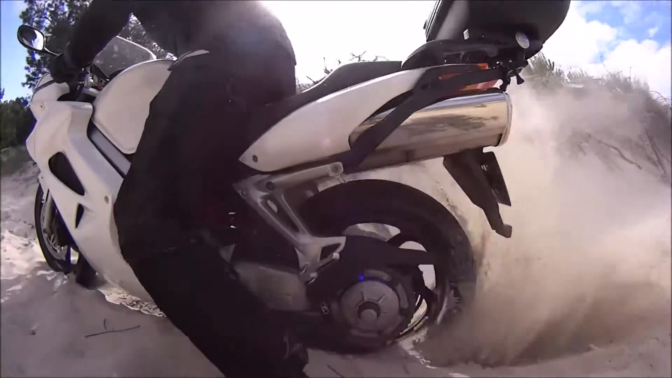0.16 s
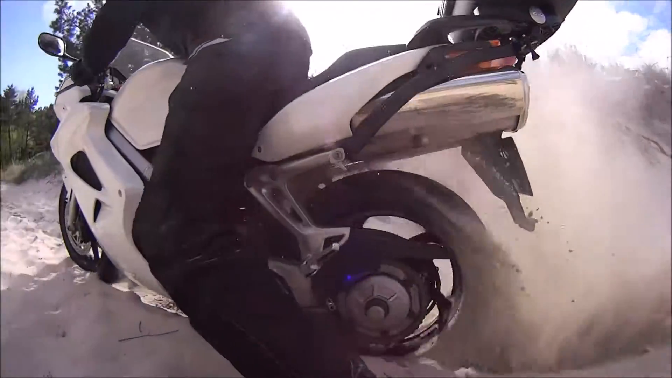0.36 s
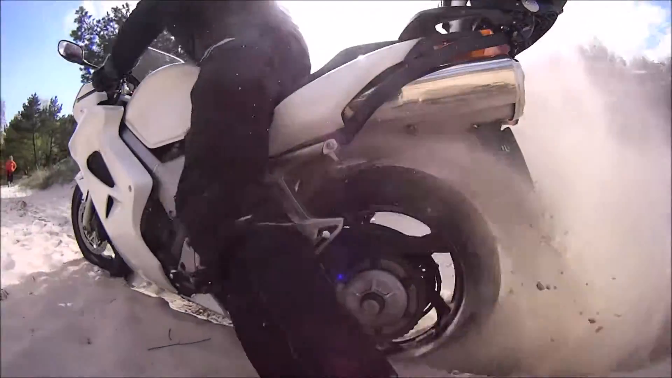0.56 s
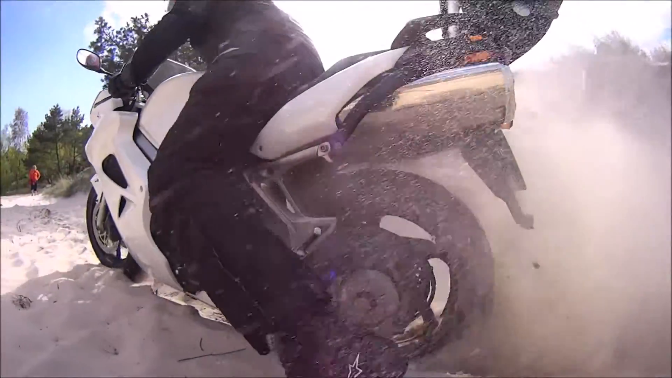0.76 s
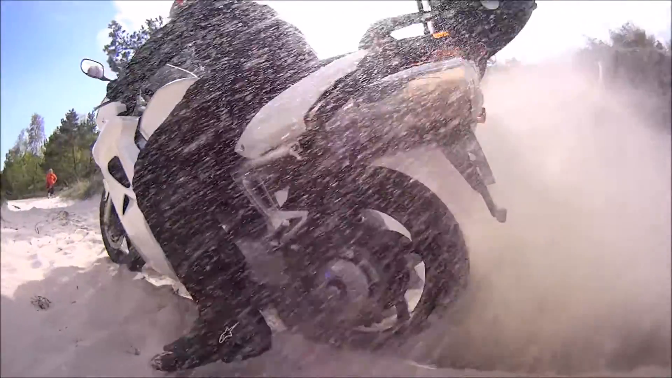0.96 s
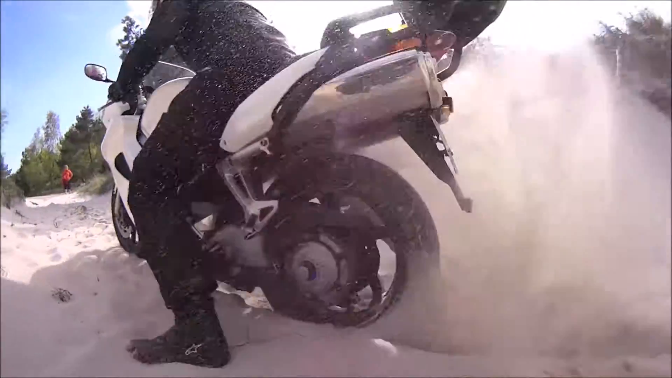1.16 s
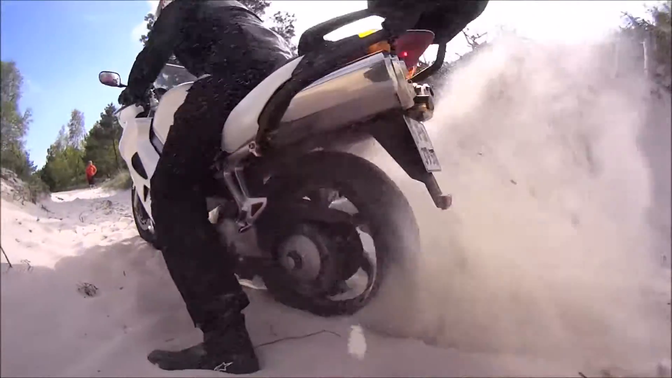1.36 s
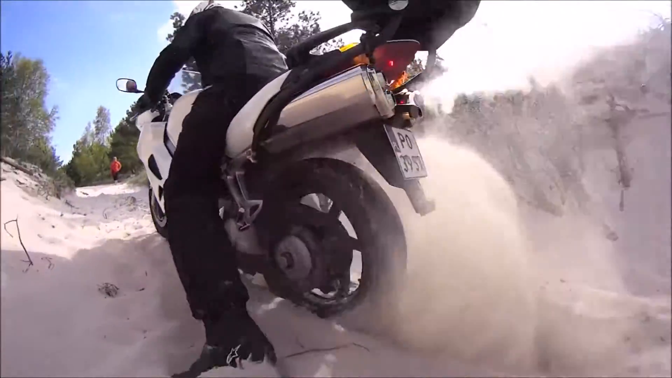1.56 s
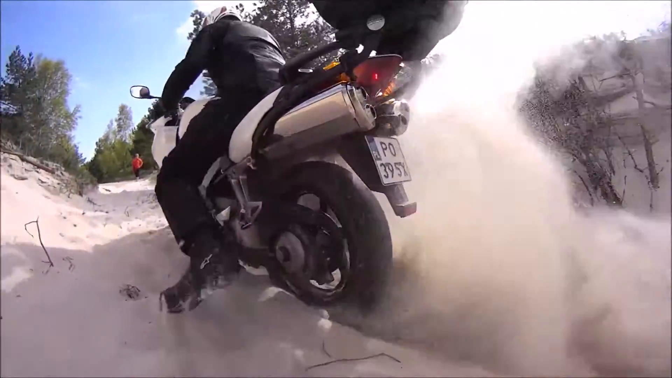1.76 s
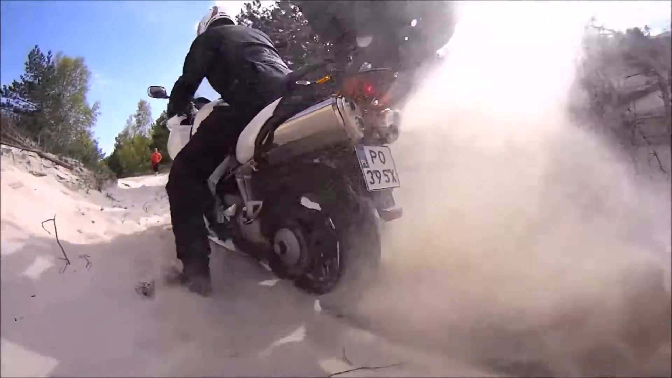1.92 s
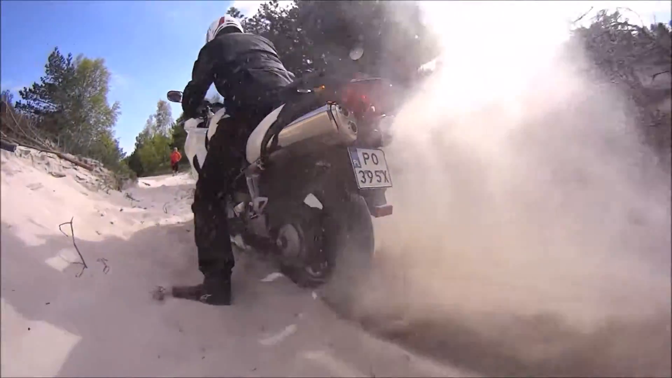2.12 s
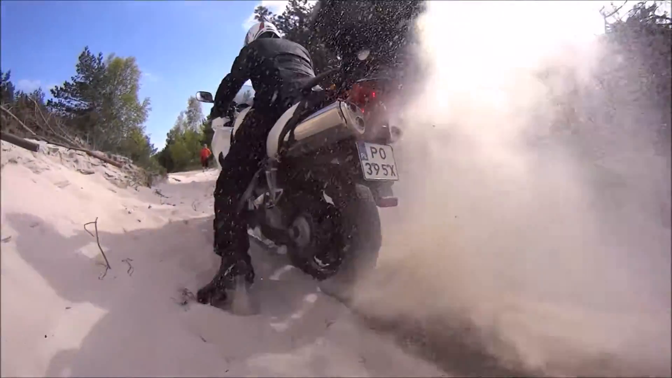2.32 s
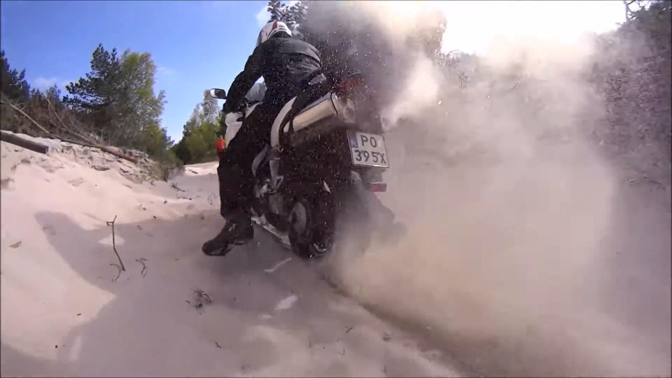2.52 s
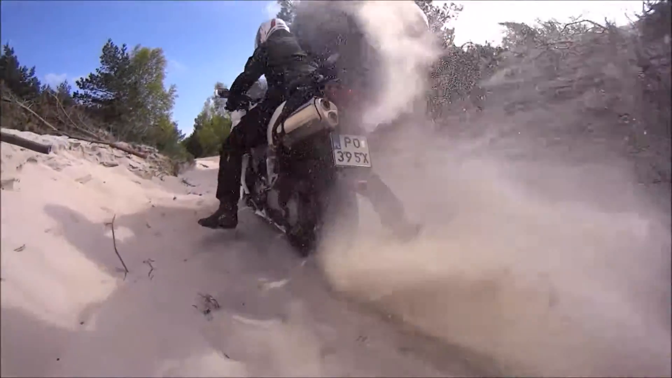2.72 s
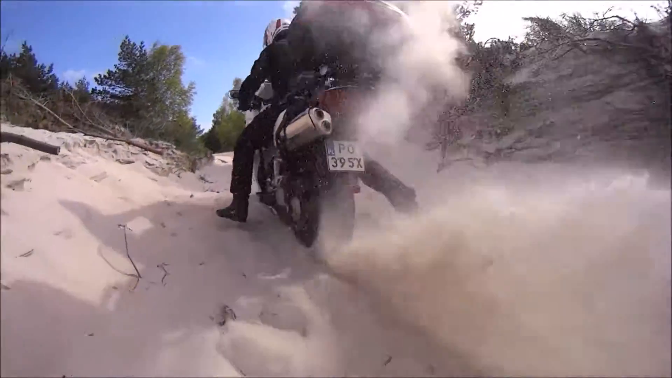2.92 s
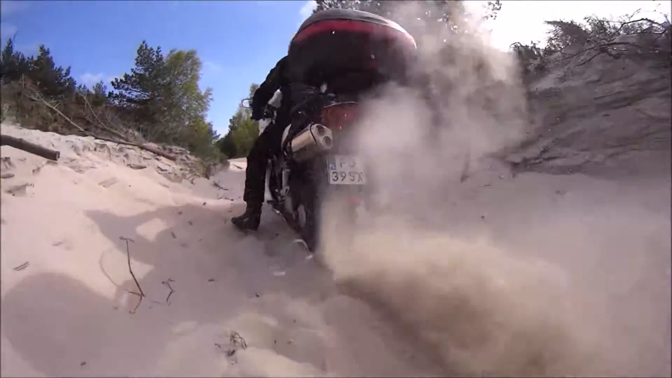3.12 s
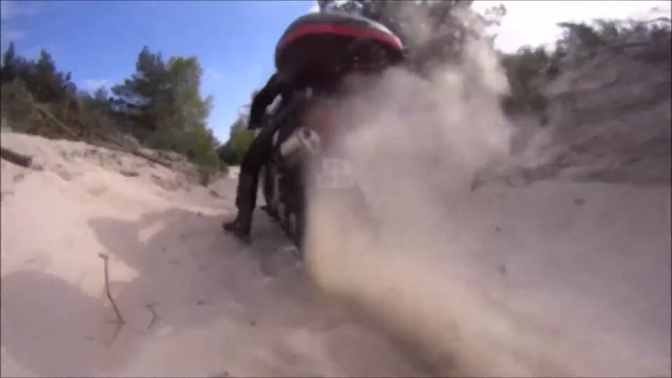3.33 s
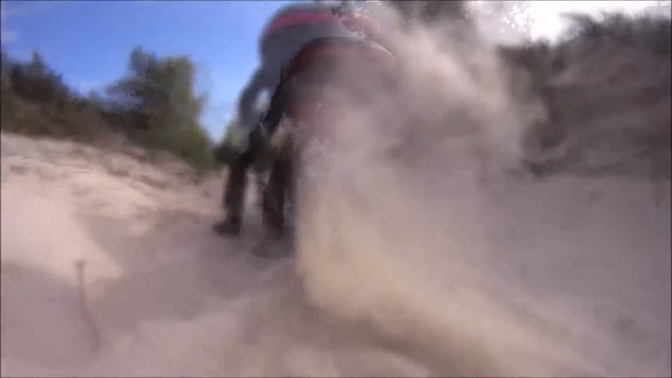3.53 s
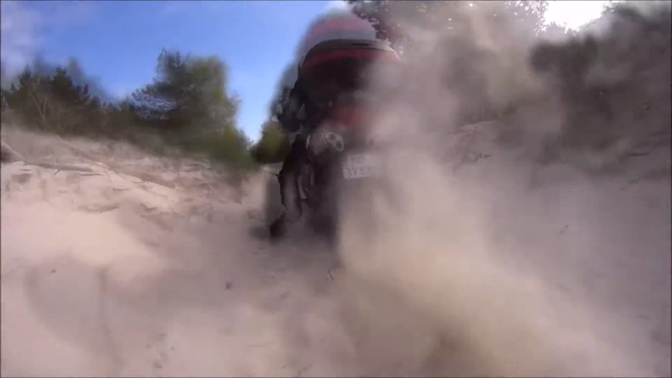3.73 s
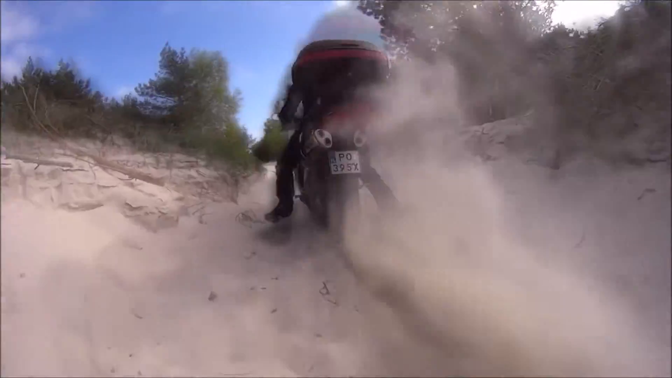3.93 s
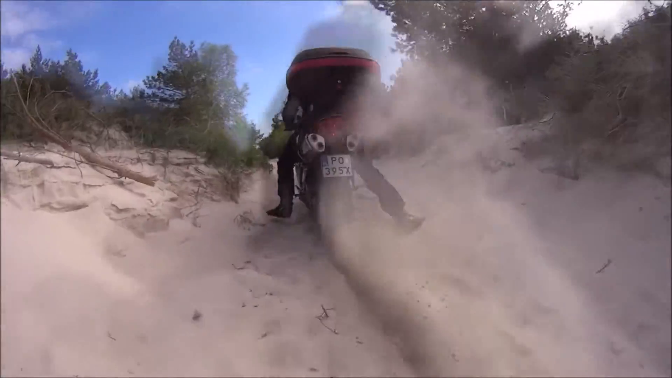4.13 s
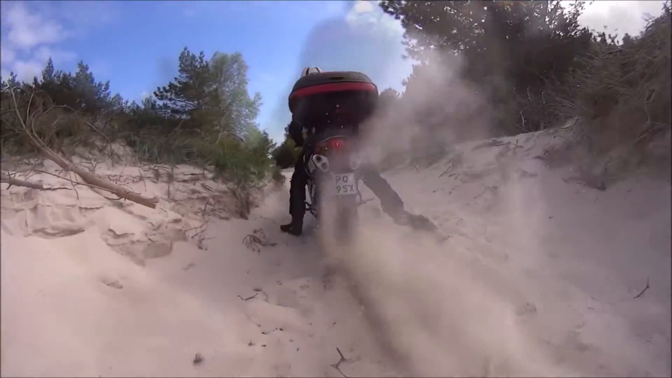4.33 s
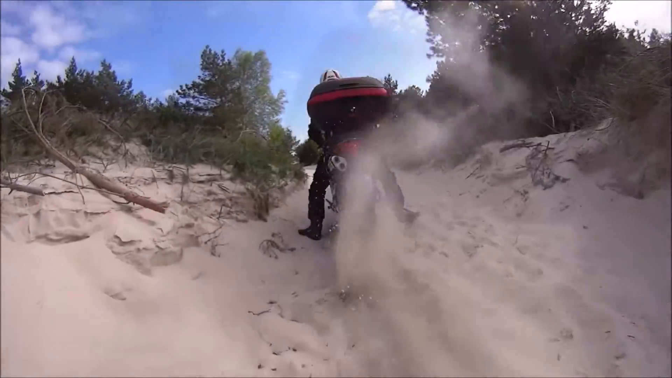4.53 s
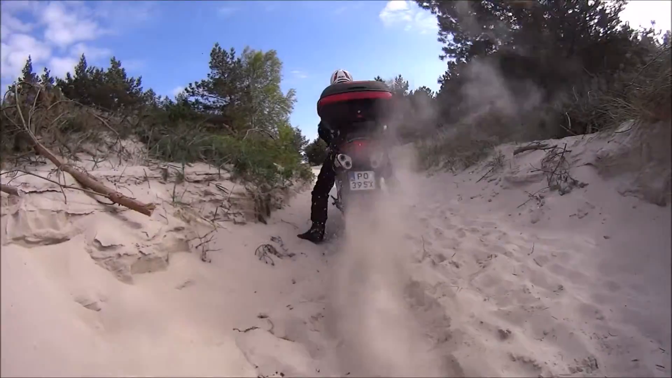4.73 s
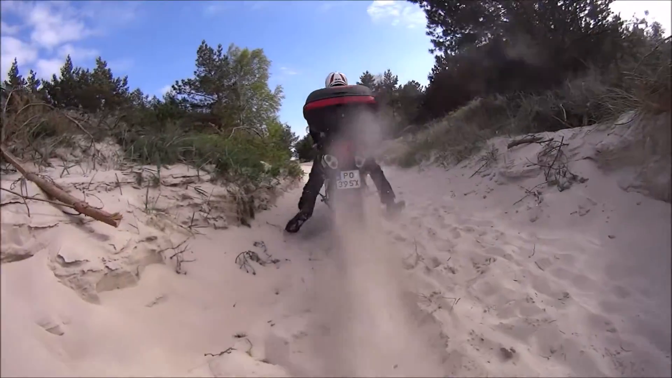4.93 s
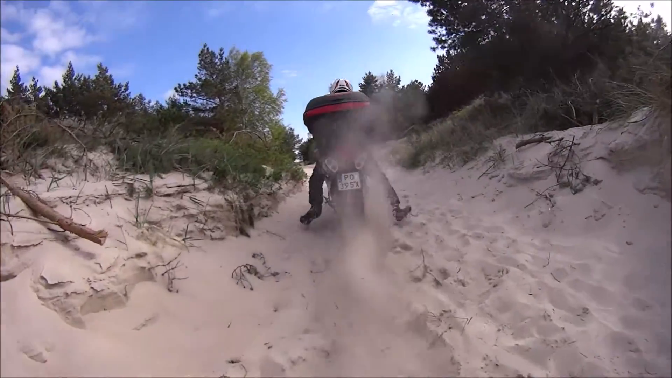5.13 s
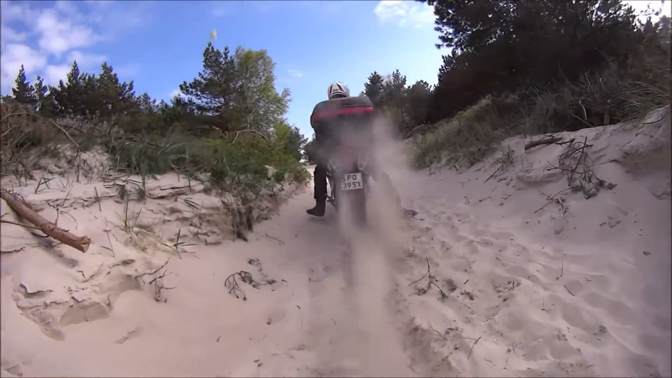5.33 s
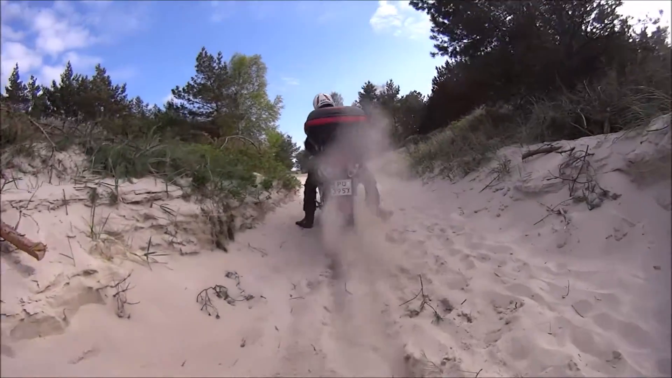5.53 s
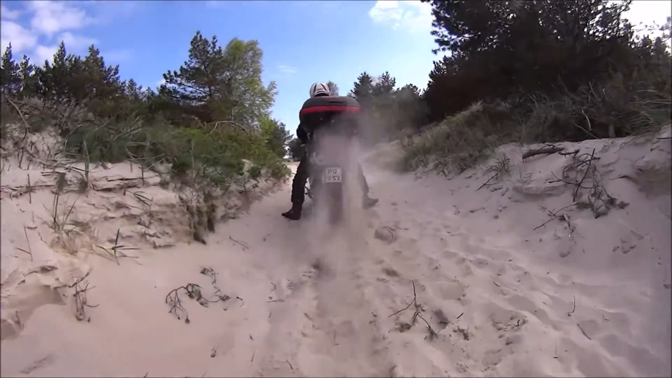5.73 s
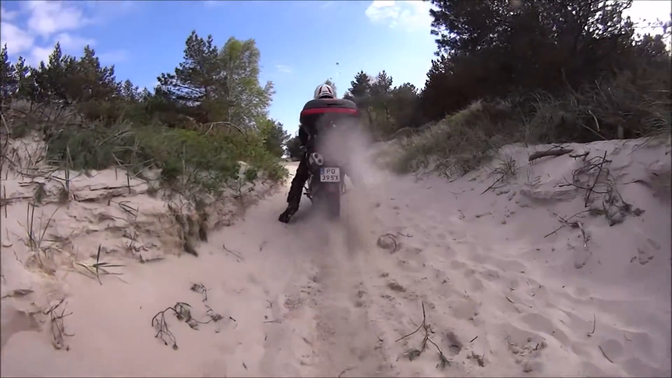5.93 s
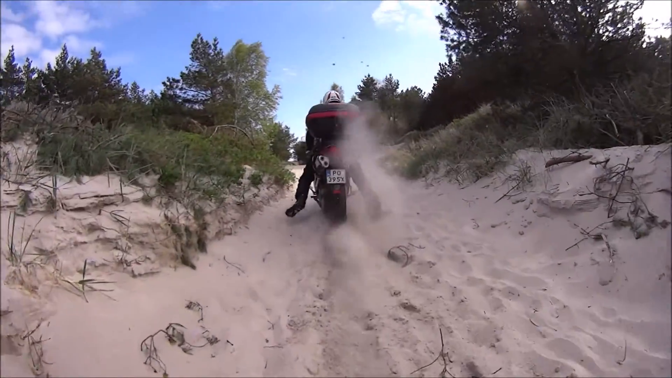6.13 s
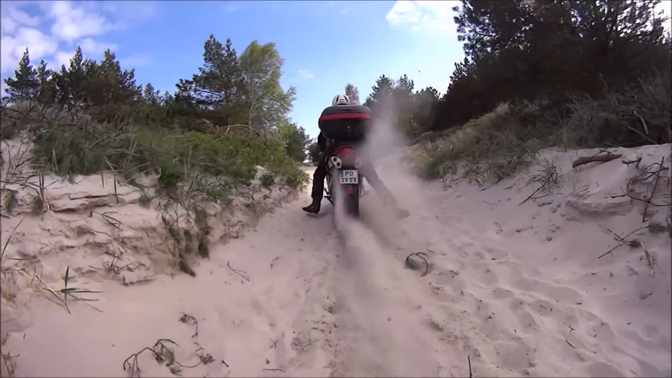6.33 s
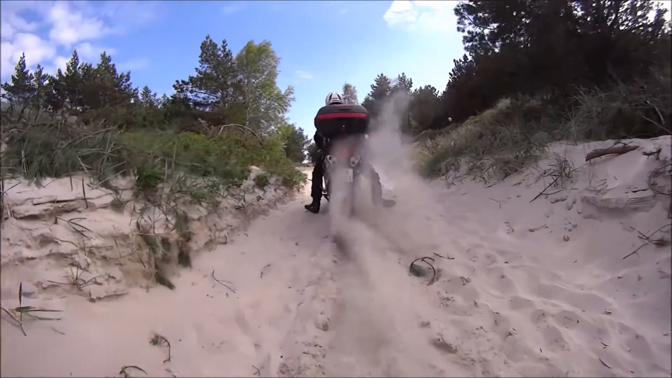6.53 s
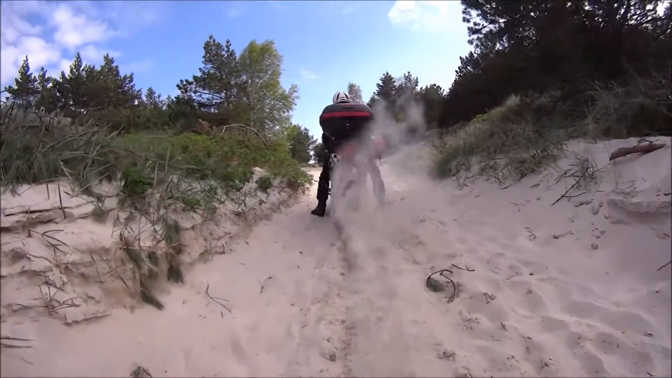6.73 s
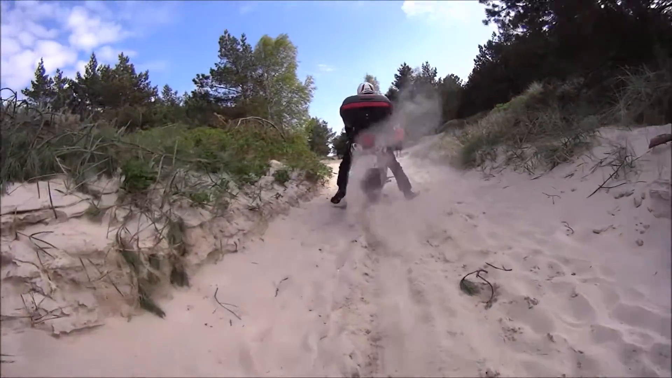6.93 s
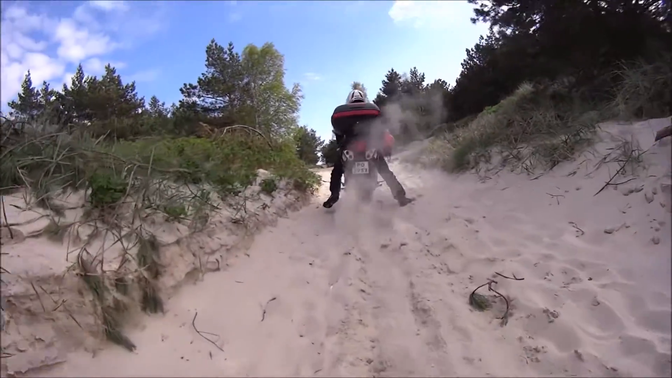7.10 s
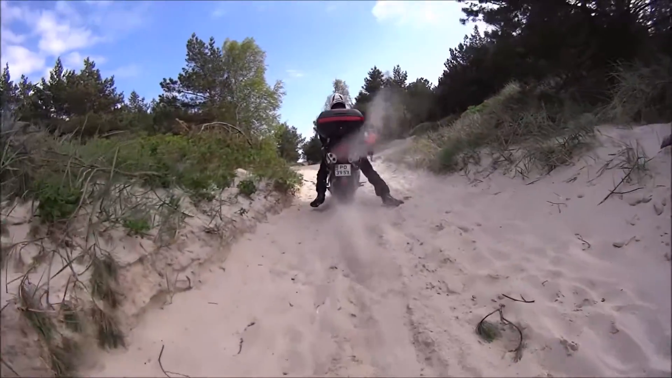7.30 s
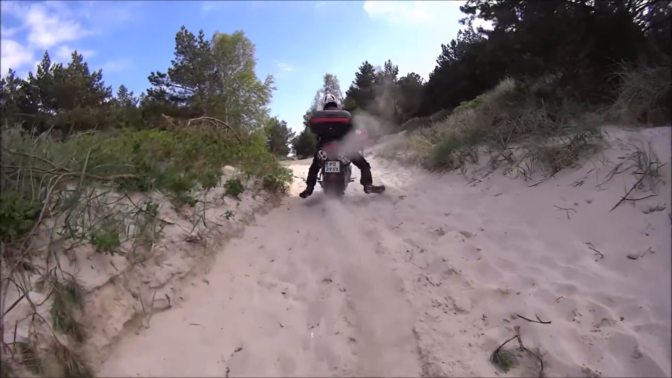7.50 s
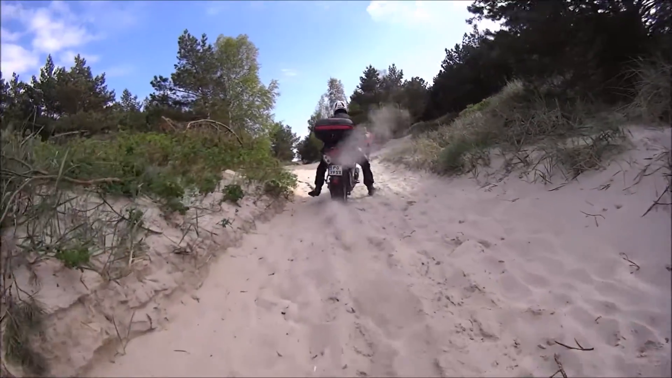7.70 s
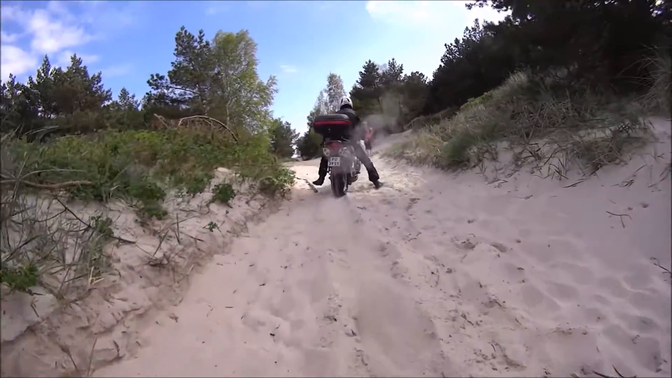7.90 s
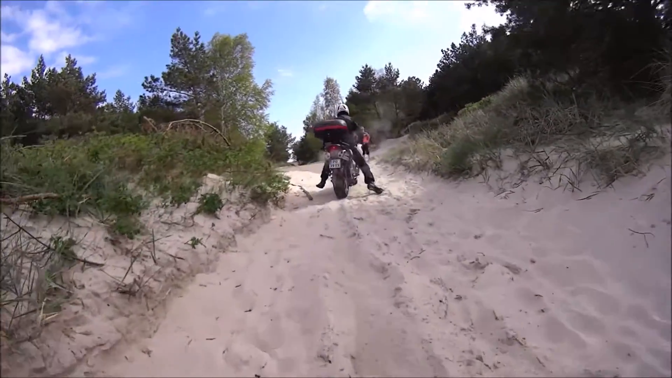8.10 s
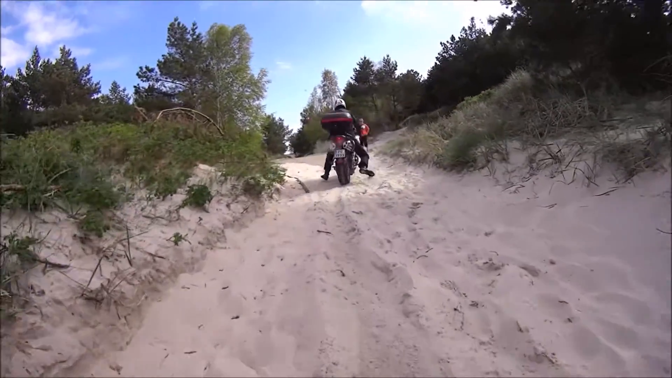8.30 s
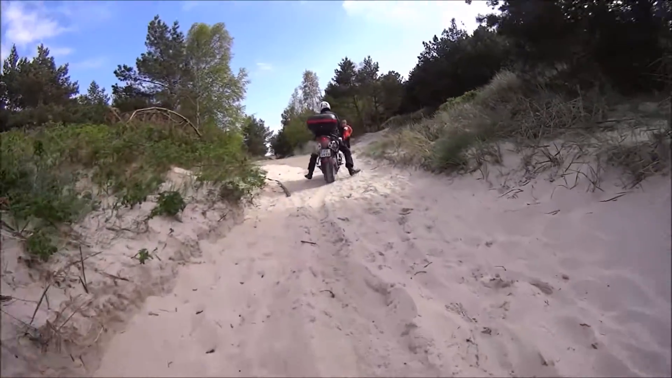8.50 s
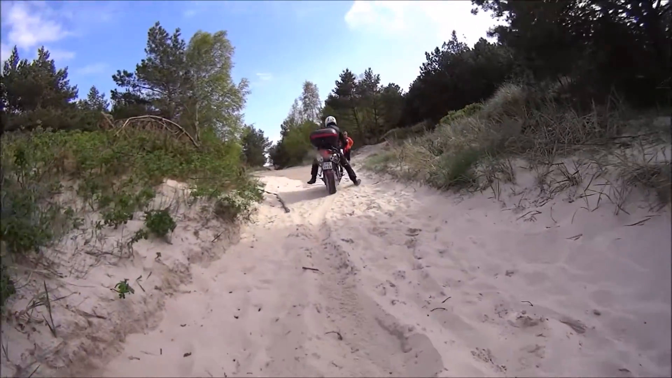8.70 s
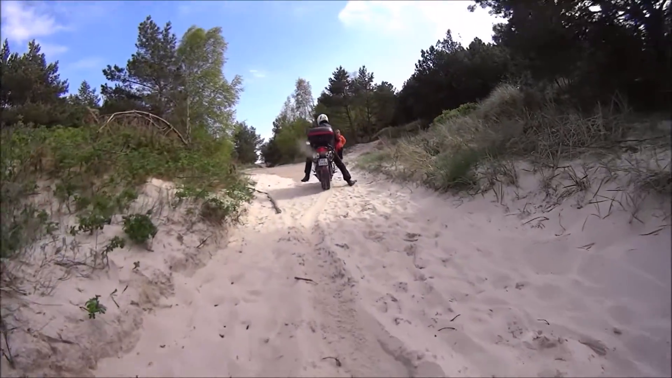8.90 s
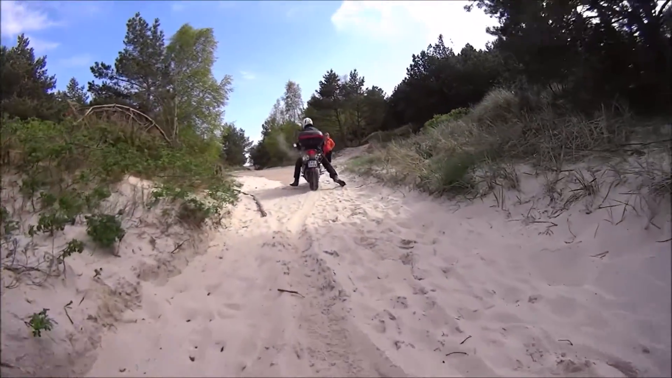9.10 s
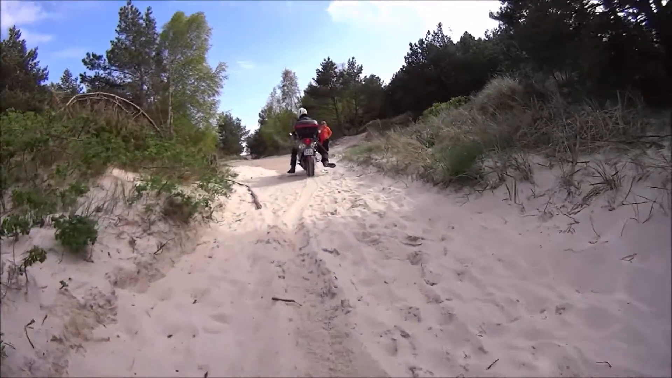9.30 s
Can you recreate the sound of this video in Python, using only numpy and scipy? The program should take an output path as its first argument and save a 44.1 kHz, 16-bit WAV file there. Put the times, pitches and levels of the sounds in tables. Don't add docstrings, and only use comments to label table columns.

```python
import sys
import numpy as np
from scipy import signal
from scipy.fft import rfft, irfft, next_fast_len
from scipy.io import wavfile
from scipy.ndimage import uniform_filter1d

SR = 44100
rng = np.random.default_rng(int(sys.argv[2]) if len(sys.argv) > 2 else 0)


def boost(x):
    u = np.asarray(x, float) / 20
    return 10 ** u


def wav_out(sig):
    wavfile.write(sys.argv[1], SR, np.round(np.clip(np.atleast_2d(sig).T, -1, 1) * 32767).astype(np.int16))


N = 412335
T = np.arange(N) / SR

# pitch_hz [Hz], density_db [dB per Hz]
RUMBLE_SPECTRUM = [(12, -37), (20, 2), (43, -2.5), (80, 1.5), (114, -1), (296, -13.5), (331, -47),
                   (400, -52), (520, -66), (880, -120)]
# centre_s [s], width_s [s], level_db [dB over the rumble]
WIND_GUSTS = [(1.2, .1, 8), (1.5, 0.13, 15), (2.7, 0.28, 7), (3.8, 0.27, 10), (4.09, 0.055, 4),
              (4.5, 0.18, 6), (5.78, 0.092, 2), (6.5, 0.047, 7), (6.75, .06, -1.5), (7.19, 0.13, 5.5),
              (7.55, 0.18, 2.5), (8.35, 0.79, -2)]
# start_s [s], peak_db [dB], ring_hz [Hz], t60_s [s], snap_db [dB]
HOUSING_KNOCKS = [
    (8.065, -15.5, 72, 0.042, -9.5),
    (8.236, -21.5, 97, 0.097, -13),
    (8.444, -21.5, 91, 0.049, -9),
    (8.639, -36.5, 150, 0.076, -2),
    (9.125, -32.5, 85, 0.1, -9),
    (9.232, -28, 106, 0.21, 1),
    (9.271, -39, 95, 0.12, 11),
]
# start_s [s], peak_db [dB]
SAND_CLODS = [
    (.787, -56),
    (1.851, -34),
    (2.477, -28),
    (2.501, -28),
    (2.582, -38),
    (3.281, -38),
    (3.308, -25),
    (3.384, -30),
    (3.638, -29.5),
    (4.27, -31),
]
# start_s [s], level_db [dB over the hiss], length_s [s]
BOOT_STEPS = [
    (8.125, 5, .05),
    (8.745, 10, .05),
]
# pitch_hz [Hz], left_db [dB], right_db [dB], likeness [0-1]
PORT_RESPONSE = [(231, -7, -6.5, 0), (617, -17.5, -15.5, 0.28), (1236, -9.5, -10.5, 0.47),
                 (1370, -4.5, -10, 0.66), (2106, 1.5, -1.5, 1), (2380, -1.5, -4.5, 0.66),
                 (2980, -5, 3, 0.86), (3840, -8, -9, 0.5), (4000, -7.5, -7.5, 0.77), (5320, -6, -8.5, 0.75),
                 (6080, -14.5, -13.5, 0.45), (7220, -10, -9.5, 0.73), (10070, -18, -20.5, 0.5),
                 (10950, -25.5, -24, 1)]
# pitch_hz [Hz], left_lead [radians]
PORT_LEAD = [(0, 0), (520, .2), (900, 3.1), (1200, 5.7), (1550, 4.8), (2150, 4.4), (2760, 2.1), (3100, 1.2),
             (4050, .5), (5750, -.4), (6550, .4), (7150, .1), (8500, .5), (9300, -.4), (10600, 0)]
# pitch_hz [Hz], width_hz [Hz], peak_db [dB]
CAVITY_RINGS = [(400, 52, -1), (683, 12, 5), (1870, 115, 4), (2840, 147, 6), (3290, 9.7, 4.5),
                (3900, 25, 3.5)]
WHISTLE_S, WHISTLE_END_S, WHISTLE_HZ, WHISTLE_DB = 3.32, 4.78, 1910, -23.5
# start_s [s], end_s [s], pitch_hz [Hz], level_db [dB]
JET_WHISTLES = [
    (WHISTLE_S, WHISTLE_END_S, WHISTLE_HZ, WHISTLE_DB),
    (1.5, 3, 4380.5, -26.5),
    (6.5, 7.5, 3369, -30.5),
]
# start_s [s], aim_hz [engine cycles a second]
THROTTLE_STEPS = [(0, 36.5), (.77, 26.2), (.94, 6.8), (1.24, 25.4), (1.52, 46.7), (1.9, 32.3), (2.18, 37.8),
                  (2.58, 42.6), (2.7, 34.6), (2.98, 27.3), (3.15, 37.8), (3.51, 35.3), (3.89, 38.4),
                  (4.21, 35.8), (4.55, 42.6), (4.86, 33.9), (5.29, 29.1), (5.72, 38), (6.03, 36.1),
                  (6.28, 28.3), (6.74, 33.4), (6.95, 36.9), (7.47, 38.6), (7.74, 7)]
# time_s [s], rasp_db [dB]
RASP_EFFORT = [(0, -21), (1.05, -20.5), (1.24, -30), (1.36, -22.5), (1.68, -19), (1.9, -21.5), (3.02, -22),
               (3.25, -24.5), (3.3, -20), (3.93, -19.5), (4.77, -20.5), (4.81, -24.5), (5.65, -31.5),
               (5.95, -27.5), (6.65, -32), (7.24, -31), (7.82, -28.5), (8.03, -46)]
# overtone [number], follows [row of MESH_LEVELS], added_db [dB], blur_hz [Hz]
GEAR_OVERTONES = [(1, 0, 5, 8), (2, 0, 4, 8), (2.85, 0, 1, 10), (3, 0, 9, 7), (3.5, 2, -2, 20),
                  (4, 1, -1, 14), (5, 2, 5, 22), (6, 2, 2, 22), (7, 3, 8, 22), (8, 3, 5, 35), (9, 4, 6, 25)]
# level_db [dB at full effort], effort_share [ratio]
MESH_LEVELS = [(-39, 1.16), (-31.5, 0.5), (-32, 0.66), (-37.5, 0.72), (-34.5, 0.98)]
# start_s [s], length_s [s], added_db [dB]
LOADED_TEETH = [
    [(.25, 0.6, 9), (2.35, 0.94, 7), (7.15, 0.57, 9)],
    [(0, 0.11, 16), (0.415, 0.082, 14), (0.802, 0.3, 8), (2.455, 0.12, 8.5), (2.72, 0.48, 11),
     (3.4, 0.64, 10), (5.2, 0.17, 6), (5.9, 0.12, 6), (7.45, 0.17, 0)],
    [(1.97, 0.15, -2), (6.42, .22, 5), (7.68, 0.13, 1)],
    [(2.65, .2, 3), (3.9, 0.13, 8), (6.08, 0.28, 6), (7.3, 0.25, 4)],
    [(2.3, .2, -1)],
]
# order [number], pipe_db [dB at resonance], side_db [dB added sideways], lug_db [dB]
MAIN_ORDERS = [(3, -33.5, 9, -35.5), (4, -32, -7.5, -57), (5, -39, 1, -32)]
# order [number], level_db [dB against the rasp]
WEAK_ORDERS = [(1, -22.5), (2, -26), (6, -27), (7, -27.5), (8, -35.5), (11, -24), (12, -40), (14, -36.5),
               (15, -35), (16, -29), (18, -32), (19, -38.5), (21, -44), (23, -35.5), (24, -28), (27, -64),
               (31, -29), (33, -37), (35, -20.5)]


def evened(x):
    return x / np.sqrt(np.mean(x ** 2) + 1e-20)


def columns(rows, at):
    first, *rest = np.transpose(rows)
    return [np.interp(at, first, c) for c in rest]


def log_columns(rows, hz):
    return columns([(np.log(f), *rest) for f, *rest in rows], np.log(hz + 1))


def filtered(x, gain):
    size = next_fast_len(N + 4096)
    return irfft(rfft(x, size) * gain(np.fft.rfftfreq(size, 1 / SR)), size)[..., :N]


def bump(t, s, width):
    return np.exp(-.5 * ((t - s) / width) ** 2)


def drift(top_hz, count=24):
    coarse = T[::256]
    waves = 0
    for f in np.geomspace(.3, top_hz, count):
        waves = waves + np.sin(2 * np.pi * (f * coarse + rng.random())) / np.sqrt(f)
    return np.interp(T, coarse, evened(waves))


def flutter(top_hz):
    knots = np.arange(0, T[-1] + 1, .5 / top_hz)
    chance = np.interp(T, knots, rng.standard_normal(len(knots)))
    return evened(uniform_filter1d(chance, size=600))


def blurred_line(turns, blur_hz, steady=0):
    coarse = T[::64]
    r = np.exp(-np.pi * blur_hz * 64 / SR)
    a, b = evened(signal.lfilter([1], [1, -r], rng.standard_normal((2, len(coarse)))))
    in_phase = (steady + np.interp(T, coarse, a)) * np.cos(2 * np.pi * turns)
    quadrature = np.interp(T, coarse, b) * np.sin(2 * np.pi * turns)
    return evened(in_phase + quadrature)


def speed(t):
    flywheel_s, full_lug_hz_per_s, coast_share = .1107, 25, .3
    slow_hz, slow_span_hz = 38, 12
    s, aim_hz = np.transpose(THROTTLE_STEPS)
    steps_hz = np.diff(aim_hz)
    u = np.maximum(t[:, None] - s[1:], 0) / flywheel_s
    hz = aim_hz[0] + (1 - (1 + u) * np.exp(-u)) @ steps_hz
    pull_hz_per_s = (u * np.exp(-u)) @ steps_hz / flywheel_s
    load = np.clip(pull_hz_per_s / full_lug_hz_per_s, coast_share, 1)
    return hz, load * np.clip((slow_hz - hz) / slow_span_hz, 0, 1)


def effort(t):
    return columns(RASP_EFFORT, t)[0] - np.maximum(t - RASP_EFFORT[-1][0], 0)


def sideways():
    turn_s, turn_length_s = 1.5, 1
    return np.clip(1 - (T - turn_s) / turn_length_s, 0, 1)


def ports(direct, left, right):
    def port(side):
        def gain(hz):
            *db, like = log_columns(PORT_RESPONSE, hz)
            lead, = columns(PORT_LEAD, hz)
            like = np.clip(like, 0, 1)
            low_cut = hz ** 4 / (hz ** 4 + 330. ** 4)
            ring_db = sum(peak_db / (1 + (2 * (hz - f) / width) ** 2) for f, width, peak_db in CAVITY_RINGS)
            shared = like ** .5 * np.exp(1j * lead * (.5 - side))
            return boost(db[side] + ring_db) * low_cut * np.array([shared, (1 - like) ** .5])
        return gain
    heard = [filtered(np.array([direct, own]), port(side)).sum(0) for side, own in enumerate((left, right))]
    return np.array(heard)


def rumble():
    level_db = -46.5 + sum(db * bump(T, s, width) for s, width, db in WIND_GUSTS)
    noise = rng.standard_normal((3, N))
    lumps = boost(2.5 * flutter(top_hz=8))
    wind = filtered(noise[0] + 0.3 * noise[1:], lambda hz: boost(log_columns(RUMBLE_SPECTRUM, hz)[0]))
    return evened(wind) * boost(level_db) * lumps


def knocks():
    out, t = np.zeros(N + SR), np.arange(SR // 4) / SR
    clod_hz, clod_t60_s, clod_snap_db = 95, 0.075, 8.5
    clods = [(s, db, clod_hz, clod_t60_s, clod_snap_db) for s, db in SAND_CLODS]
    for s, db, hz, t60, snap_db in clods + list(HOUSING_KNOCKS):
        swell = np.minimum(t * hz * 2, 1)
        ring = -np.sin(2 * np.pi * hz * t) * boost(-60 * t / t60) * swell
        snap = boost(snap_db + 9.5) * (t / 0.00032) * np.exp(-t / 0.0002) * np.cos(2 * np.pi * 400 * t)
        snap += boost(snap_db - 3.5 - 60 * t / 0.014) * np.sin(2 * np.pi * 370 * t)
        at = round(s * SR)
        out[at:at + len(t)] += boost(db) * (boost(-1.5) * ring + snap)
    return out[:N]


def crunch():
    gain = 1
    for s, db, length in BOOT_STEPS:
        rise = np.clip((T - s) / 0.0062, 0, 1)
        fall = np.clip((s + length - T) / 0.0084, 0, 1)
        gain = gain + (boost(db) - 1) * rise * fall
    return gain


def whistle():
    out = np.zeros(N)
    for s, end, hz, db in JET_WHISTLES:
        on = np.clip(np.minimum((T - s) / 0.047, (end - T) / .02), 0, 1)
        turns = np.cumsum(hz + 18 * drift(4)) / SR
        out += on * boost(db + 1.3 * drift(4)) * blurred_line(turns, blur_hz=30, steady=0.75)
    return out


def hiss(turns):
    chop_depth, fade_s, end_s = 0.29, 5, 9.5
    depth = chop_depth * np.clip((end_s - T) / (end_s - fade_s), 0, 1)
    chain = 5.76 * turns
    chain_beat = np.cos(2 * np.pi * chain) + .5 * np.cos(np.pi * chain)
    chop = 1 + depth * chain_beat + 0.055 * np.cos(2 * np.pi * turns)
    grain_size = boost(3.17 * np.minimum(rng.exponential(1, N), 5))
    struck = rng.random(N) < 1500 / SR
    grains = grain_size * struck * rng.choice([-1, 1], N)
    streams = rng.standard_normal((3, N)) * chop
    streams[0] += 0.41 * evened(grains)
    return streams * boost(.8 * flutter(top_hz=24))


def mottle(shape, bands, frames):
    field = uniform_filter1d(rng.standard_normal(shape), size=bands, axis=0)
    return evened(uniform_filter1d(field, size=frames, axis=1))


def shaped(streams):
    hz, t, z = signal.stft(streams, SR, nperseg=512, noverlap=384)
    hz = hz[:, None]
    rasp_db = effort(t)
    spray_db = 2 * bump(t, 2.52, 0.21)
    treble_db = -1.72 + spray_db - 3.5 * np.clip((t - 7.78) / 0.033, 0, 1)
    body_share, body_lug_db = 0.63, 6
    body_db = -25 + (body_share - 1) * (rasp_db + 23.5) + body_lug_db * speed(t)[1]
    high = np.clip((hz - 3200) / 700, 0, 1)
    low = np.clip((1250 - hz) / 350, 0, 1)
    patches = mottle(z.shape[1:], bands=7, frames=40)
    streaks = mottle(z.shape[1:], bands=2, frames=11)
    far_db = -3.5 * np.exp(-((hz - 2900) / 350) ** 2) * np.clip((t - 7.9) / 0.09, 0, 1)
    field_db = far_db + rasp_db + high * (treble_db + 4.0) + low * (body_db + 20.5)
    field_db = field_db + 0.46 * patches + 1.9 * streaks
    field_db = field_db + (1 - low) * 20 * np.log10(np.interp(t, T, crunch()))
    return signal.istft(z * boost(field_db), SR, nperseg=512, noverlap=384)[1][:, :N]


def whine(turns, hz, rasp_db):
    cruise_hz, db_per_octave, edge_s = 36.5, 12, .1
    teeth = turns * 40 / 3
    speed_db = db_per_octave * np.log2(hz / cruise_hz)
    level_db = [db + share * (rasp_db + 21) + speed_db for db, share in MESH_LEVELS]
    for k, rows in enumerate(LOADED_TEETH):
        for s, length, db in rows:
            inside_s = np.minimum(T - s, s + length - T)
            level_db[k] = level_db[k] + db * np.clip(inside_s / edge_s + .5, 0, 1)
    lines = 0
    for n, k, db, blur_hz in GEAR_OVERTONES:
        steady = 1.2 * (n in (3, 4, 6, 9))
        lines = lines + boost(level_db[k] + db) * blurred_line(n * teeth, blur_hz, steady)
    return lines * np.clip((7.9 - T) / 0.12, 0, 1)


def mains(hz, lug, rasp_db):
    pipe_hz, pipe_width_hz, pipe_fall_db, pipe_share = 168.3, 35, -8.5, 0.35
    thud_hz, thud_width_hz = 95, 50
    side = sideways()
    out = []
    for order, pipe_db, side_db, lug_db in MAIN_ORDERS:
        off = np.minimum(((order * hz - pipe_hz) / pipe_width_hz) ** 2, 2.3)
        effort_db = pipe_share * (rasp_db + 18)
        ring = boost(pipe_db + side_db * side + pipe_fall_db * off + effort_db + drift(top_hz=1.9))
        thud = lug * boost(lug_db + 0.21 * (rasp_db + 13)) * bump(order * hz, thud_hz, thud_width_hz)
        out.append(20 * np.log10(ring + thud))
    return out


def exhaust(turns, main_db, rasp_db, lug):
    running = np.clip((8.06 - T) / 0.057, 0, 1)
    out = np.zeros((2, N))
    misfire_db = 3.2 * bump(T, 3.75, .55)
    rough_db = 1.7 - .5 * lug + misfire_db
    for order, db in zip((3, 4, 5), main_db):
        sway = 0.15 * drift(2.7) * np.array([[1], [-1]])
        level = np.sqrt(2) * boost(db + rough_db * flutter(top_hz=11))
        out += level * np.cos(2 * np.pi * (order * turns + rng.random()) + sway)
    chug_hz, chug_span_hz, chug_db = 31, 14, 14
    chug = chug_db * np.clip((chug_hz - np.gradient(turns) * SR) / chug_span_hz, 0, 1)
    side_db = -3 * sideways()
    for order, db in WEAK_ORDERS:
        if order > 5:
            db = db + side_db
        if order in (7, 8):
            db = db + chug
        elif order > 8:
            db = db - 14 * lug
        effort_db = min(.5 + .09 * order, 1.5) * (rasp_db + 22) - 26
        steady = 1. * (order < 3) + 1.5 * lug
        out += boost(db + effort_db) * blurred_line(order * turns, 1.2 + .28 * order, steady)
    return out * running


def scene():
    hz, lug = [np.interp(T, T[::64], c) for c in speed(T[::64])]
    turns, rasp_db = np.cumsum(hz) / SR, effort(T)
    streams = boost(11.5) * shaped(hiss(turns))
    streams[0] += whine(turns, hz, rasp_db) + whistle()
    engine = exhaust(turns, mains(hz, lug, rasp_db), rasp_db, lug)
    return ports(*streams) + engine + rumble() + knocks()


def band_limit(x):
    return signal.sosfilt(signal.butter(12, 11020, fs=SR, output="sos"), x)


def record(dry):
    ceiling = 1.1
    limited = ceiling * np.tanh(dry / ceiling)
    taps = signal.firwin(1023, 11030, window=("kaiser", 9), fs=SR)
    mix = signal.oaconvolve(limited, taps[None], "same")
    return band_limit(mix)


dry = scene()
out = record(dry)
wav_out(out)
```